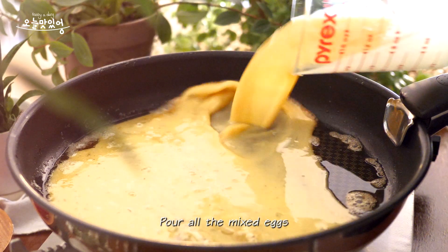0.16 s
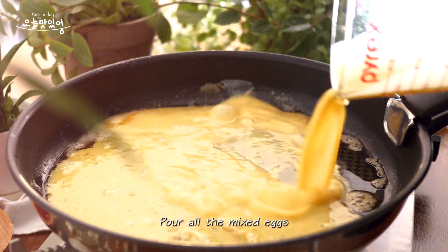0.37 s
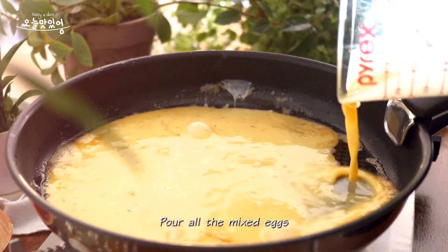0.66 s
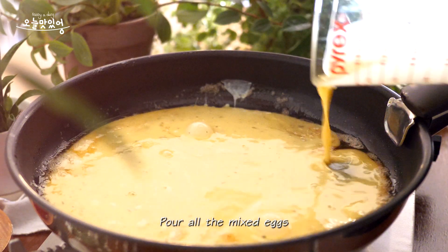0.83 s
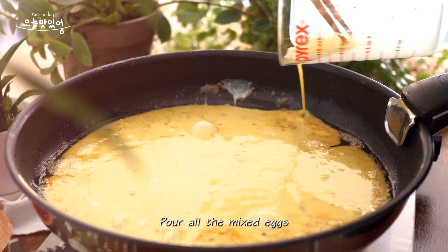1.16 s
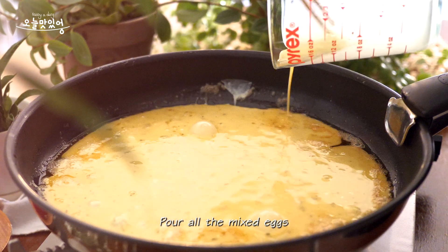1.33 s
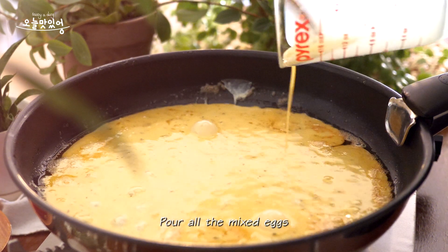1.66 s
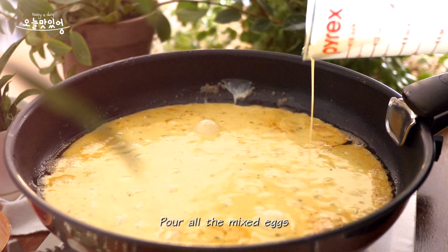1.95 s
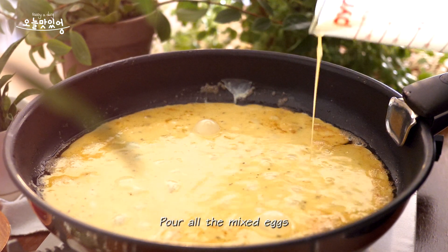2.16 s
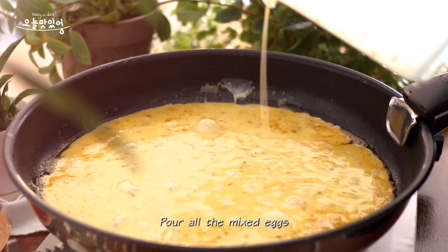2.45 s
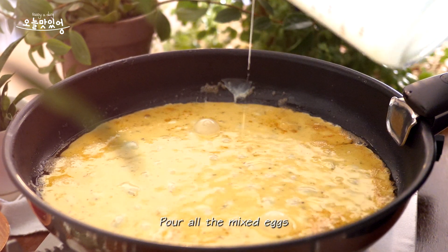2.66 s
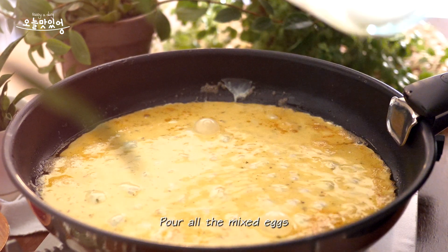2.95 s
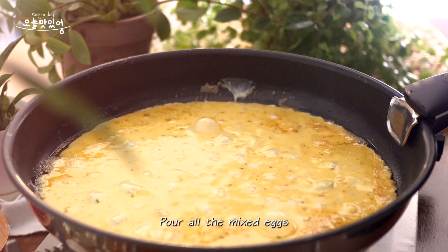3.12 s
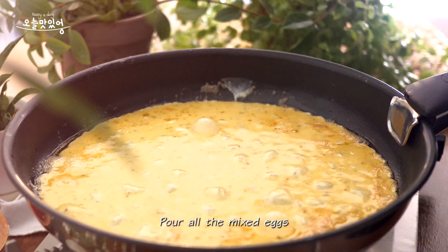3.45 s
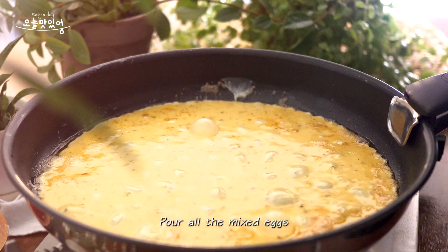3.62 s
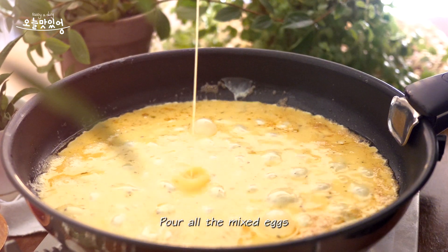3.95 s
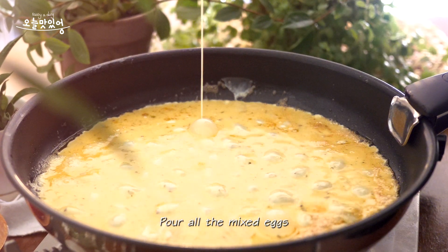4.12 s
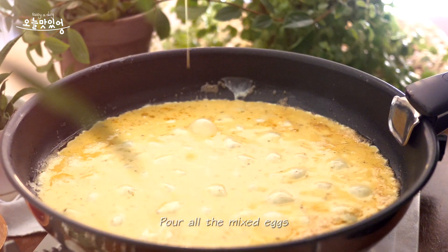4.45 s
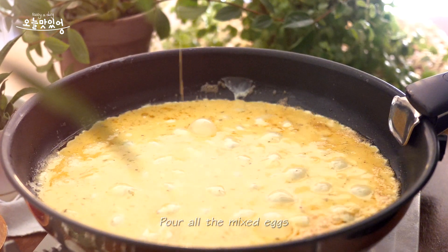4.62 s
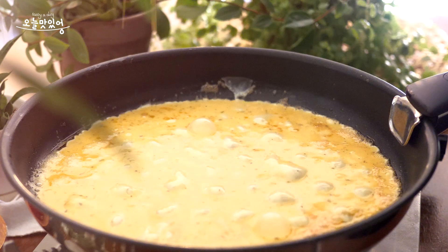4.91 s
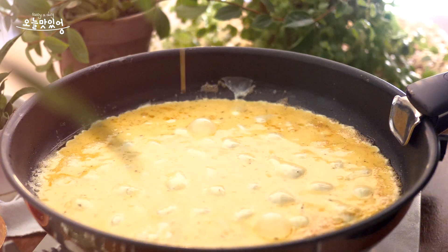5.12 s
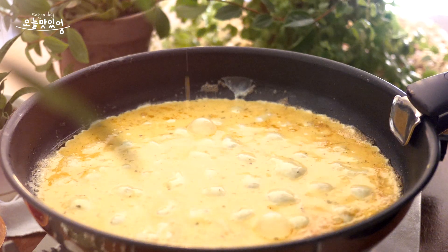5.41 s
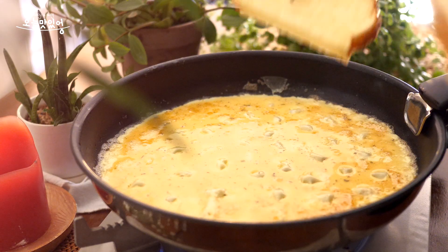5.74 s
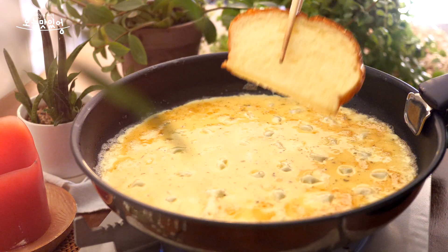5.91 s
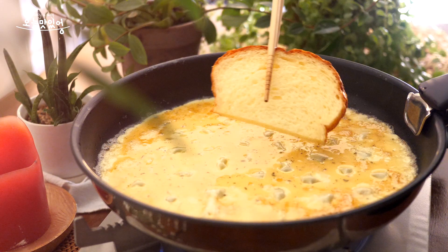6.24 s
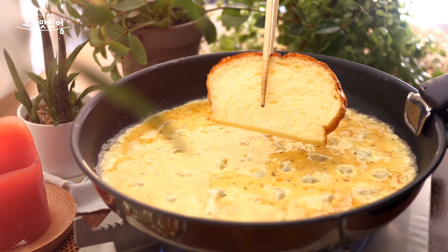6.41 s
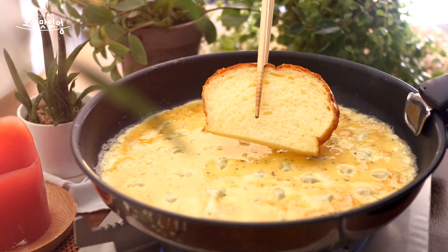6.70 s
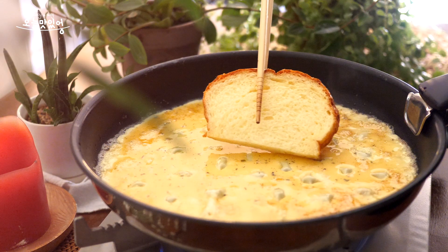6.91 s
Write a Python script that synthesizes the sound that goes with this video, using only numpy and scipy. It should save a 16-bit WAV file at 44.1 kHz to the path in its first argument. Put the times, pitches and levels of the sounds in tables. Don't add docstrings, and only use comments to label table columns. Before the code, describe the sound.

Close, wet frying of liquid egg with bubbling plops, fat spits and glassy taps, cutting suddenly to a faint mutter and brief steam sputter.

```python
import sys
import numpy as np
from scipy import signal
from scipy.fft import rfft, irfft, next_fast_len
from scipy.io import wavfile
from scipy.ndimage import uniform_filter1d, minimum_filter1d

SR = 44100
rng = np.random.default_rng(int(sys.argv[2]) if len(sys.argv) > 2 else 0)


def gain_from_decibels(decibels):
    exponent = np.asarray(decibels, float) / 20
    return 10 ** exponent


def store_wav(level_fs):
    pcm = np.round(np.clip(np.atleast_2d(level_fs), -1, 1) * 32767)
    wavfile.write(sys.argv[1], SR, pcm.T.astype(np.int16))


N = 311787
SCENE_CHANGE_S = 5.563


def evened(x):
    return x / np.sqrt(np.mean(x ** 2) + 1e-20)


def read(points, hz):
    f, value = np.transpose(points)
    return np.interp(np.log(hz + 1e-3), np.log(f), value)


def played(rows):
    s, *columns = np.transpose(rows)
    return [np.interp(np.arange(N) / SR, s, c) for c in columns]


def add(mix, s, sound):
    part = mix[round(s * SR):][:len(sound)]
    part += np.asarray(sound)[:len(part)]


def coloured(x, points):
    size = next_fast_len(len(x))
    gain = gain_from_decibels(read(points, np.fft.rfftfreq(size, 1 / SR)))
    return irfft(rfft(x, size) * gain, size)[:len(x)]


def band(x, lo_hz, hi_hz):
    edges_hz = [lo_hz, min(hi_hz, SR / 2.1)]
    return signal.sosfilt(signal.butter(N=2, Wn=edges_hz, btype="band", fs=SR, output="sos"), x)


def clicks(per_s, spread_db):
    sign = rng.choice([-1., 1.], N)
    size = gain_from_decibels(spread_db * np.minimum(rng.exponential(1, N), 3.8)) * sign
    return size * (rng.random(N) < per_s / SR)


def drift(seconds):
    width = int(seconds * SR)
    return evened(uniform_filter1d(uniform_filter1d(rng.standard_normal(N), width), width))


def bubble(hz, cycles, rise=0.08):
    u = np.arange(int(SR * 2 * cycles / hz)) / SR * hz
    tone = -np.sin(2 * np.pi * (u + rise * u ** 2 / 2 / cycles))
    return tone * np.exp(-2.3 * u / cycles) * (1 - np.exp(-u / 0.29))


def snap(hz):
    width_cycles, echo_s, echo_db = 0.37, 0.000516, -10
    t = np.arange(-.001, .003, 1 / SR)
    return sum(gain_from_decibels(db) * np.sin(2 * np.pi * hz * u) * np.exp(-(hz * u / width_cycles) ** 2)
               for u, db in ((t, 2.5), (t - echo_s, echo_db)))


# frequency in Hz, density in dB per Hz.
AIR_SPECTRUM = [(15, -32), (25, 13.5), (60, -2.5), (205, 3), (359, 2.5), (438, -3.5), (724, -6.5),
                (784, -11), (884, -9.5), (2130, -22), (3000, -20), (3900, -49), (6600, -120)]
# time in seconds, burner and garden in dB, rumble in dB.
AIR_LEVELS = [(0, -60, -60), (2.5, -52.5, -61.5), (4.33, -52, -62.5), (4.5, -52.5, -55), (5.55, -52.5, -60),
              (5.58, -56, -55), (5.97, -56.5, -59), (6.1, -56, -56), (6.34, -56, -54), (6.48, -57, -66),
              (6.8, -57, -57), (7.07, -56, -62)]


def air():
    breath_db, rumble_db = played(AIR_LEVELS)
    breath = evened(coloured(rng.standard_normal(N), AIR_SPECTRUM))
    rumble = evened(band(rng.standard_normal(N), 12, 52))
    rumble_db = rumble_db + 1.6 * drift(0.13)
    return gain_from_decibels(breath_db + 3.5) * band(breath, 119, 4800) + gain_from_decibels(rumble_db) * rumble


# time in seconds, bubble level in dB, pitch in Hz.
STREAM_COURSE = [
    (.88, -32, 4120),
    (1.0, -24, 4770),
    (1.1, -29.5, 5270),
    (1.25, -35, 5700),
    (1.351, -48, 5700),
]


def stream(count=160):
    cycles, pitch_scatter, scatter_db = 14, .09, 2.5
    out, (s, db, hz) = np.zeros(N), np.transpose(STREAM_COURSE)
    times = rng.uniform(s[0], s[-1], count)
    for when, size, off in zip(times, *rng.standard_normal((2, count))):
        pitch_hz = np.interp(when, s, hz) * (1 + pitch_scatter * off)
        level_db = np.interp(when, s, db) + scatter_db * size
        add(out, when, gain_from_decibels(level_db) * bubble(pitch_hz, cycles))
    return out


# start in seconds,
# peak in dB, pitch in Hz, ring in cycles, relative pitch climb.
AIR_POCKETS = [(0.245, -22.5, 1240, 28, 0.029), (.331, -26.5, 663, 20, 0.2),
               (0.441, -18, 1300, 6.2, -0.055), (0.463, -28, 169, 1.9, 0.064), (.548, -28, 1450, 60, .6),
               (.582, -22, 2100, 25, .1), (.594, -24, 2180, 30, .04), (.612, -25, 2240, 40, -.03),
               (.65, -29, 1960, 20, 0.055), (.869, -26, 677, 7.1, 0.062), (1.055, -21, 2550, 19, -0.028),
               (1.174, -20, 1350, 8.9, -0.038), (1.479, -13.5, 2590, 11, .05), (1.348, -17, 2700, 9, .05),
               (1.716, -21, 2750, 9, -0.032), (1.765, -10.5, 830, 2.4, 0.38),
               (4.448, -16, 980, 3.1, -0.032), (4.427, -25, 930, 4.2, -0.21), (6.058, -35, 95, 2.4, 0.21),
               (6.1, -45, 90, 4.6, -.1), (6.21, -47, 70, 7.3, -0.27), (6.81, -49, 75, 7, 0)]


def air_pockets():
    out = np.zeros(N)
    for s, db, hz, cycles, rise in AIR_POCKETS:
        add(out, s, gain_from_decibels(db + 1.5) * bubble(hz, cycles, rise))
    return out


def kitchen(x):
    level_db, t60_s, delay_s = -16, .25, .004
    t = np.arange(SR // 3) / SR
    tail = rng.standard_normal(len(t)) * gain_from_decibels(-60 * t / t60_s) * (t > delay_s)
    return gain_from_decibels(level_db) * signal.oaconvolve(x, tail / np.linalg.norm(tail))[:N]


def ring(modes, t, upper_db, damping):
    return sum(gain_from_decibels(db + upper_db * (hz > 4500) - 60 * damping * t / t60) * np.sin(2 * np.pi * hz * t)
               for hz, db, t60 in modes)


# frequency in Hz, gain in dB.
DRY_TICK = [(100, -30), (600, -6), (1500, 0), (5000, -1), (9000, -3), (10300, -14), (12000, -10),
            (15500, -14), (16200, -40)]
# frequency in Hz, level in dB, T60 in seconds.
WALL_MODES = [(3334, -3, .04), (3372, 0, .045), (3366, -15, .36), (5000, -8, .012), (6290, -14, .06),
              (6440, -8, .04), (6484, -15, .25), (7350, -5, .05), (7418, -6, .17), (11490, -12, .03),
              (13340, -22, .06)]
SPOUT_MODES = [(3700, 0, .008), (3748, 1, .047), (3772, -14, .13), (3790, -26, .25), (5100, -12, .02),
               (6150, -6, .03), (6487, -22, .1), (7340, -10, .035), (8000, 2, .008), (8085, -3, .055),
               (8104, -9, .13), (8390, -10, .03), (13330, -27, .08), (14090, -24, .1)]
LOW_MODES = [(1350, -6, 0.025), (1340, -16, 0.14), (1570, 7, 0.0072), (2400, -9, 0.006),
             (2490, -7.5, 0.022), (2830, -20, 0.012)]


def tap(wall_db, spout_db, upper_db, db, shimmer, resting):
    damping = 2.2 if resting else 1
    t = np.arange(12000) / SR
    decay = 1.65 * gain_from_decibels(-60 * t / 0.0026) + gain_from_decibels(-60 * t / 0.025) + 0.15 * gain_from_decibels(-60 * t / 0.54)
    tick = coloured(rng.standard_normal(len(t)) * decay, DRY_TICK) * (t < .2)
    if resting:
        tick = band(tick, 280, 9500)
    glass = gain_from_decibels(wall_db) * ring(WALL_MODES, t, upper_db, damping)
    glass += gain_from_decibels(spout_db) * ring(SPOUT_MODES, t, upper_db, damping)
    glass += gain_from_decibels(spout_db) * ring(LOW_MODES, t, upper_db, damping)
    glass *= shimmer[:len(t)] ** np.minimum(t / .03, 1)
    onset = 1 - np.exp(-t / 0.0002)
    return gain_from_decibels(db - 4.0) * tick / abs(tick).max() + glass * onset


# start in seconds, tick peak in dB, wall modes in dB,
# spout modes in dB, lift of the upper modes in dB.
BOUNCING_TAPS = [
    (1.8024, 0, -29, -13.5, 4.5),
    (1.8100, -10, -38, -15, -16),
    (2.8636, -9, -13, -23.5, -0.5),
    (2.8731, -8, -26, -41, -2),
    (4.0991, -1.5, -24, -9.5, -8),
    (5.3729, -12.5, -42, -23.5, -13),
]
RESTING_STICKS = [
    (0.8172, -8, -37, -31, -1),
    (1.851, -24, -18.5, -42, 2),
    (2.0804, -10, -28.5, -40, 7),
    (3.056, -9, -19.5, -23, 1.5),
    (3.0615, -16, -22.5, -32, -1),
]
# time in seconds, level in dB, pitch in Hz.
HARD_CRACKS = [
    (1.8031, -13.5, 1800),
    (4.0994, -8, 1600),
    (3.1101, -15, 6600),
]
# frequency in Hz, level in dB, T60 in seconds.
RIM_MODES = [(4700, -22, .012), (6465, -29, .09), (6510, -38, .15), (7434, -30, .04)]


def jug():
    out = np.zeros(N)
    shimmer = gain_from_decibels(3.0 * drift(.003))
    for rows, resting in ((BOUNCING_TAPS, False), (RESTING_STICKS, True)):
        for s, db, wall_db, spout_db, upper_db in rows:
            add(out, s, tap(wall_db, spout_db, upper_db, db, shimmer[round(s * SR):], resting))
    for s, db, hz in HARD_CRACKS:
        add(out, s - .001, gain_from_decibels(db) * snap(hz))
    add(out, 5.3733, ring(RIM_MODES, np.arange(12000) / SR, 0, 1))
    return out + kitchen(out)


# time in
# seconds, steam in dB, bare hot fat in dB.
FRYING_COURSE = [(0.0, -43, -30.5), (0.35, -34, -31.5), (1.0, -34, -32), (1.4, -31, -34),
                 (1.8, -31.5, -38.5), (1.815, -44, -52), (1.885, -40, -33), (1.93, -32, -38),
                 (2.3, -30.5, -41), (2.7, -32, -43), (3.15, -35, -44), (3.5, -32.5, -45), (4.0, -34.5, -45),
                 (4.5, -35.5, -46.5), (5.2, -37.5, -46.5), (5.55, -37, -47)]


def cooking():
    t = np.arange(N) / SR
    steam_db, fat_db = played(FRYING_COURSE)
    hiss_db = -41 + 0.49 * (fat_db + 26.5)
    pitch_hz = 1443 - 100 * t
    swell_db = 5 * np.exp(-((t - 6.2) / 0.22) ** 2)
    liquid = steam_db, pitch_hz, fat_db, hiss_db
    firm = -55, 860, -61 + swell_db, -63.5 + .5 * swell_db
    return [np.where(t < SCENE_CHANGE_S, a, b) for a, b in zip(liquid, firm)]


def rim_crackle(fizz_db, hiss_db):
    lively = uniform_filter1d(gain_from_decibels(fizz_db) + gain_from_decibels(hiss_db), SR // 2)
    ticks = -lively * gain_from_decibels(-7) * evened(abs(clicks(per_s=220, spread_db=2.5)))
    fine = -gain_from_decibels(-55.5) * evened(abs(clicks(per_s=200, spread_db=2.5)))
    add(ticks, SCENE_CHANGE_S, fine)
    return coloured(ticks, DRY_TICK)


TICK_LAG_S = .0013
# time in seconds, peak in dB.
CLEAR_TICKS = [(3.9304, -31), (3.9918, -23), (4.2976, -33), (4.3364, -33), (4.947, -33), (5.088, -33),
               (5.6242, -47), (5.7397, -36), (5.933, -48), (6.001, -34), (6.028, -33.5), (6.0518, -38),
               (6.083, -44), (5.589, -45)]


def clear_ticks():
    out = np.zeros(N)
    for s, db in CLEAR_TICKS:
        add(out, s + TICK_LAG_S, [-gain_from_decibels(db + 14.5)])
    return coloured(band(out, 300, 6500), DRY_TICK)


# time in seconds, puffs per second, unevenness from 0 to 1, puff level in dB.
VENT_COURSE = [
    (6.111, 69, 0, -24),
    (6.277, 63.5, 0, -24),
    (6.367, 46, 0, -25),
    (6.39, 36, 0, -28),
    (6.53, 41, .05, -27),
    (6.535, 41, .05, -70),
    (7.07, 45, .4, -70),
]


def vent():
    per_s, uneven, db = played(VENT_COURSE)
    is_open = np.arange(N) >= VENT_COURSE[0][0] * SR
    pace = per_s * np.maximum(1 + uneven * drift(.01), .1) * is_open
    puffs = np.diff(np.ceil(np.cumsum(pace) / SR), prepend=0)
    puffs = -puffs * gain_from_decibels(db + 2.0 * rng.standard_normal(N))
    return coloured(band(puffs, 500, 8000), DRY_TICK)


# frequency in Hz, density in dB per Hz.
FIZZ_SPECTRUM = [(70, -23.5), (150, -14), (880, -13), (1500, 2), (2090, -4.5), (2600, -3), (3630, -3),
                 (6820, -9.5), (9000, -11), (11700, -30.5), (19800, -120)]
HISS_SPECTRUM = [(2940, -34), (5000, -22), (5750, 1), (7060, -7), (8710, 4.5), (10300, -11.5), (11100, -6),
                 (14100, -7), (15800, -42), (16300, -43), (16500, -60)]


def fizz(level_db, points, per_s, spread_db, smooth, flicker_db):
    drive = evened(clicks(per_s, spread_db)) * (1 - smooth) + smooth * rng.standard_normal(N)
    return gain_from_decibels(level_db + flicker_db * drift(0.021)) * evened(coloured(drive, points))


# start in seconds, peak in dB, centre in Hz, top band against the peak in dB.
FAT_SPITS = [(0.366, -9.5, 8100, -15), (0.371, -12, 6500, 0), (0.3759, -0.5, 8350, 1.5),
             (0.5384, -26, 3740, 1), (0.583, -12.5, 8250, -13), (0.621, -14.5, 8500, 0),
             (4.0404, -31, 8500, 4), (0.869, -14, 3700, -21), (1.3513, -22, 3700, -16),
             (1.38, -19, 8500, 2), (1.621, -7.5, 7750, -1.5), (1.852, -10.5, 8600, -14),
             (1.8578, -3.5, 8450, 0), (2.0215, -27, 4230, 5), (2.0837, -14, 7500, -9),
             (2.0858, -2, 8050, -4.5), (2.243, -20, 3520, -11), (2.441, -19.5, 5940, -17),
             (2.977, -27, 6000, 1), (3.1014, -7.5, 7800, -11), (3.1097, -4, 8100, -11),
             (3.493, -18, 5300, -15), (3.643, -18.5, 3740, -15), (3.7676, -19.5, 7500, 1.5),
             (3.915, -24, 5210, -9), (3.975, -28, 8560, -6), (4.0206, -23.5, 4520, -7),
             (4.853, -26, 5500, 5), (4.8795, -19, 3900, -15), (4.9606, -21.5, 6300, 2)]


def spits():
    out, t = np.zeros(N), np.arange(3000) / SR
    for s, db, hz, top_db in FAT_SPITS:
        noise = rng.standard_normal(len(t))
        snap_part = noise * gain_from_decibels(-60 * t / .002)
        spray_t60_s = 0.021 * gain_from_decibels(0.43 * db)
        spray = noise * (gain_from_decibels(-60 * t / spray_t60_s) + .12 * gain_from_decibels(-60 * t / .2))
        burst = snap_part + 0.39 * spray
        wide = band(burst, 1200, 9500)
        top = band(snap_part + .12 * spray, 11000, 15500)
        body = band(burst, hz / 1.61, hz * 1.19) + 0.46 * wide
        add(out, s, gain_from_decibels(db) * (body / abs(body).max() + gain_from_decibels(top_db) * top / abs(top).max()))
    return out


# time in seconds, peak in dB, pitch in Hz (negative pushes first).
SKIN_CRACKS = [(0.0082, -11, 3198), (0.2424, -17, -3200.0), (0.2633, -14, 2800.0), (0.4962, -17, -3700.0),
               (0.6214, -25, -2800.0), (0.8696, -11, 7400.0), (1.0518, -16, -4400.0), (1.3985, -15, 3700.0),
               (1.578, -16, 3700.0), (1.5937, -19, 4400.0), (1.74, -16, -3700.0), (2.022, -20, 5500.0),
               (2.1757, -20, -3200.0), (2.2425, -22, 5498), (2.3452, -26, 5500.0), (2.668, -19, -3200.0),
               (2.7233, -21, 3200.0), (2.995, -24, 5500.0), (3.0955, -22, 2800.0), (3.2276, -20, 5502),
               (3.3126, -20.5, -7400.0), (3.3703, -25, -4400.0), (3.5675, -21, 3700.0),
               (3.6432, -19, 3700.0), (3.735, -24, 5500.0), (3.7401, -29, 2200.0), (3.7676, -13.5, 2400.0),
               (3.9161, -28, 7400.0), (3.9626, -22, 7400.0), (3.9746, -17, 7400.0), (4.272, -27, 4400.0),
               (4.299, -32, -2800.0), (4.3441, -26, 5500.0), (4.6228, -30, -2800.0), (4.6703, -29, 3200.0),
               (4.7186, -24, 7400.0), (4.7564, -23, 7400.0), (4.8027, -27, 5500.0), (4.8078, -20, 2400.0),
               (4.8536, -23, 7400.0), (4.8794, -18, 7400.0), (4.9608, -20, 7400.0), (5.0882, -32, 5500.0),
               (5.2045, -30, -3700.0), (5.2518, -34, -2200.0), (5.287, -28, 5500.0), (5.3526, -26, 7400.0),
               (5.4433, -26, -3200.0), (5.5295, -33, 3700.0), (5.5472, -25, 5500.0)]
# time in seconds, peak in dB.
LATE_SPITS = [(6.0114, -39), (6.0972, -42), (6.2073, -41), (6.2452, -40), (6.3388, -38), (6.3524, -43),
              (6.4594, -43), (6.5374, -43), (6.5544, -42), (6.5598, -38), (6.5778, -42), (6.5915, -40),
              (6.7581, -43), (6.8138, -40), (6.8318, -40), (6.9067, -41), (6.6114, -29), (6.6411, -36),
              (6.6655, -41), (6.6835, -44), (6.7189, -47), (6.7454, -44), (6.7863, -43), (6.8047, -35),
              (6.8566, -40), (6.8751, -46), (6.9289, -39), (6.9783, -47), (6.9863, -45), (7.0043, -43),
              (7.0287, -42)]


def snaps():
    out = np.zeros(N)
    for s, db, hz in SKIN_CRACKS:
        add(out, s - .001, gain_from_decibels(db) * snap(hz))
    for s, db in LATE_SPITS:
        add(out, s + TICK_LAG_S - .001, gain_from_decibels(db + 1.3) * snap(5800))
    return out


# start in seconds, peak in dB, pitch in Hz.
BRIGHT_BEADS = [(0.2794, -28, 2090), (0.4319, -8.5, 2500), (0.7304, -23, 2440), (1.5855, -15, 2490),
                (1.5964, -10, 2570), (2.28, -10.5, 2570), (2.3526, -23, 2600), (2.3965, -24, 3100),
                (2.4748, -19, 3220), (2.5346, -12, 2390), (2.5611, -25, 2560), (2.6474, -23, 2590),
                (2.6658, -18, 3290), (2.7056, -14, 2010), (3.266, -24, 3290), (3.297, -21, 3060),
                (4.0203, -28, 2570), (4.788, -28, 2490)]
# start in seconds, peak in dB, pitch in Hz.
SET_EGG_MUTTERS = [(5.606, -28, 915), (5.742, -18.5, 684), (5.906, -38, 738), (5.934, -23, 710),
                   (6.028, -23, 860), (6.114, -36, 552), (6.158, -32, 789), (6.474, -33.5, 590),
                   (6.508, -30, 1180), (6.804, -29, 676), (7.004, -23, 900)]
# time of loudest swing in seconds, peak in dB, pitch in Hz.
MIDDLING_PLOPS = [(.561, -21, 1470), (.569, -21, 1470), (.730, -18, 1450), (.804, -22, 1520),
                  (1.140, -17, 1510), (1.357, -23, 1380), (1.4506, -22, 1290), (1.5976, -16, 1200),
                  (1.8528, -20, 756), (2.156, -20, 1200), (2.192, -19, 1340), (2.501, -17, 1220),
                  (3.066, -18, 1100), (3.078, -20, 1180), (3.275, -18, 1050), (3.479, -22, 1100),
                  (3.5377, -19.5, 1000), (3.5457, -19, 1120), (3.6588, -17.5, 1000), (3.8415, -26, 1150),
                  (4.1905, -21, 900), (4.2297, -23, 1050), (4.3786, -18.5, 980), (4.828, -21, 1180),
                  (5.0196, -21, 950), (5.187, -22, 945), (5.7196, -37, 950), (5.7352, -33, 950),
                  (6.043, -41, 1050), (6.1394, -38, 1050), (6.2332, -38, 880), (6.3147, -37, 1100),
                  (6.3403, -41, 1050), (6.5202, -36, 950), (6.6499, -37, 1000), (6.7968, -41, 1100),
                  (6.975, -41, 980)]
# start in seconds,
# peak in dB, pitch in Hz, ring in cycles.
LARGE_POPS = [(0.081, -15, 1840, 13), (0.235, -10.5, 1240, 8.9), (0.304, -5, 1220, 3),
              (0.702, -16, 1410, 4.5), (0.761, -19, 1740, 3.9), (0.968, -19, 1200, 4),
              (0.206, -24, 1630, 4), (1.125, -12, 1386, 3.1), (1.26, -8, 1260, 1.8), (1.3, -13, 1790, 7),
              (1.485, -12, 1300, 9.8), (1.755, -7, 950, 2.3), (2.011, -15, 1180, 4.9),
              (2.128, -20, 1210, 2.1), (2.185, -15, 1080, 7.3), (2.621, -14, 1060, 4.3),
              (2.666, -10, 926, 3.1), (3.803, -16, 1060, 4), (1.89, -29, 1570, 4),
              (2.965, -10.5, 1030, 5.5), (3.0952, -10, 1190, 2.5), (3.325, -16, 920, 5.6),
              (3.492, -13, 1350, 7.3), (3.606, -17, 950, 3.5), (3.876, -13, 930, 2), (3.992, -12, 960, 4.1),
              (4.035, -16.5, 970, 7.3), (4.0981, -10, 1370, 15), (4.438, -5.5, 950, 2.5),
              (4.788, -18, 1320, 3), (4.742, -19, 1000, 3.7), (4.622, -15, 1010, 2.1),
              (4.85, -16, 891, 2.8), (4.878, -14, 1100, 3.5), (5.052, -14.5, 875, 4.9),
              (5.335, -15, 950, 1.5), (5.412, -7.5, 1100, 1.3), (5.527, -24, 692, 3),
              (5.258, -20, 883, 3.7), (5.372, -15.5, 1000, 5.5)]


def pops():
    out = np.zeros(N)
    for s, db, hz in BRIGHT_BEADS:
        add(out, s, gain_from_decibels(db + 4.0) * bubble(hz, 1.9))
    for s, db, hz in SET_EGG_MUTTERS:
        add(out, s, gain_from_decibels(db) * bubble(hz, 1.8))
    for s, db, hz in MIDDLING_PLOPS:
        add(out, s - 0.00091, gain_from_decibels(db + 1.0) * bubble(hz, 3.4))
    for s, db, hz, cycles in LARGE_POPS:
        add(out, s + 0.000904, gain_from_decibels(db - 4.0) * bubble(hz, cycles))
    return out


# pitch as a ratio to the usual pitch, level in dB.
SIZE_SPREAD = [(.3, -63), (.5, -17.5), (.7, -10), (.85, -2), (1.1, -2.5), (1.5, -3), (2.2, -8.5),
               (3.5, -31)]
# frequency in Hz, gain in dB.
PAN_RADIATION = [(300, -29), (480, -6), (560, 7.5), (714, 4.5), (786, 1.5), (900, 2), (1360, 1), (1600, -4),
                 (1800, 1), (2250, -4.5), (2680, 3.5), (3100, 3), (3600, 9)]


def bubbling(level_db, pitch_hz, count=18):
    train = clicks(per_s=2500, spread_db=1.6) * gain_from_decibels(0.35 * drift(0.018))
    kind = rng.integers(0, count, N)
    pitch_hz, out = uniform_filter1d(pitch_hz, SR // 2), np.zeros(N)
    for k, hz in enumerate(np.geomspace(480, 3600, count)):
        shape = bubble(hz, 3.82 * rng.uniform(0.45, 3.3))
        sizes = train * (kind == k) * gain_from_decibels(read(SIZE_SPREAD, hz / pitch_hz))
        out += signal.oaconvolve(sizes, shape / np.linalg.norm(shape))[:N]
    return gain_from_decibels(level_db + 0.5) * evened(coloured(out, PAN_RADIATION))


def scene():
    steam_db, pitch_hz, fizz_db, hiss_db = cooking()
    mid = air() + stream() + air_pockets() + jug()
    mid += rim_crackle(fizz_db, hiss_db) + clear_ticks() + vent()
    mid += fizz(fizz_db + 0.19, FIZZ_SPECTRUM, per_s=5000, spread_db=4.0, smooth=0.39, flicker_db=1.9)
    mid += fizz(hiss_db - .3, HISS_SPECTRUM, per_s=6500, spread_db=9.5, smooth=0.6, flicker_db=3.0)
    mid += spits() + snaps() + pops() + bubbling(steam_db, pitch_hz)
    return np.array([mid, mid])


def thinned_treble(hz, z):
    loudness = minimum_filter1d(np.sqrt(np.mean(abs(z[:460]) ** 2, axis=0)), size=3)
    nearby = uniform_filter1d(abs(z), size=150, axis=0)
    threshold = np.minimum(gain_from_decibels(-14) * loudness, .92 * nearby)
    faint = uniform_filter1d(abs(z), size=3, axis=0) < threshold
    return np.where(faint & (hz[:, None] > 6000), 0, z)


# frequency in Hz, side against mid in dB.
SIDE_LEVEL = [(60, -15.5), (300, -17.5), (700, -23), (2000, -20.5), (6000, -13.5), (9000, -14),
              (15000, -8.5)]


def side_signal(hz, t, z):
    typical = minimum_filter1d(uniform_filter1d(abs(z), size=40, axis=0), size=5, axis=1)
    fitful_db = 3.2 * np.clip(rng.standard_normal(len(t)), -2, 1.3)
    bursts = gain_from_decibels(np.where(t < SCENE_CHANGE_S, fitful_db, 4.5))
    chosen = rng.random((len(hz) // 16 + 1, len(t))) < .5
    kept = np.repeat(chosen, 16, axis=0)[:len(hz)]
    phase = np.exp(2j * np.pi * rng.random(z.shape))
    return kept * typical * gain_from_decibels(read(SIDE_LEVEL, hz))[:, None] * bursts * phase


def roll_off(x):
    return signal.sosfilt(signal.butter(12, 16970, fs=SR, output="sos"), x)


# frequency in Hz, density in dB per Hz.
MIC_NOISE = [(880, -37), (1500, -10), (2260, 2.5), (2630, -4), (4850, -22), (12500, -1.5), (15500, -6),
             (16500, -40)]
# frequency in Hz, gain in dB.
TOP_EDGE = [(15600, 0), (16000, -22), (16900, -30), (17000, -100)]


def record(dry):
    hiss_db = np.where(np.arange(N) / SR < SCENE_CHANGE_S, -55.5, -64.5)
    mid = dry[0] + gain_from_decibels(hiss_db) * evened(coloured(rng.standard_normal(N), MIC_NOISE))
    mid = coloured(np.clip(mid, -.96, .96), TOP_EDGE)
    hz, t, z = signal.stft(mid, SR, nperseg=2048, noverlap=1024)
    side = side_signal(hz, t, z)
    z = thinned_treble(hz, z)
    ears = signal.istft(np.array([z + side, z - side]), SR, nperseg=2048, noverlap=1024)[1]
    return roll_off(ears[:, :N])


dry = scene()
out = record(dry)
store_wav(out)
```